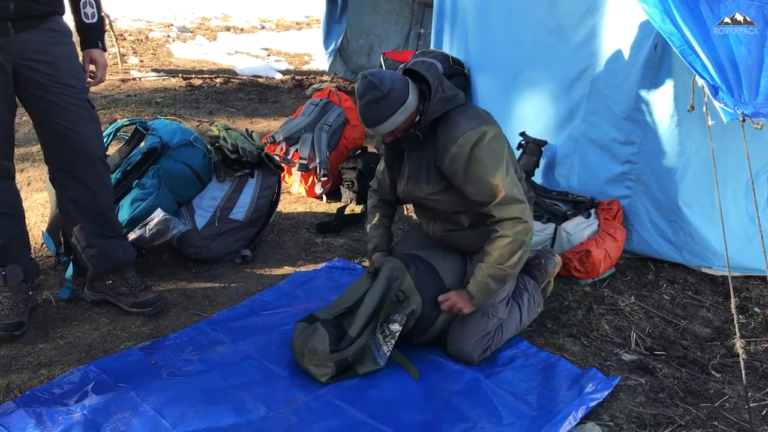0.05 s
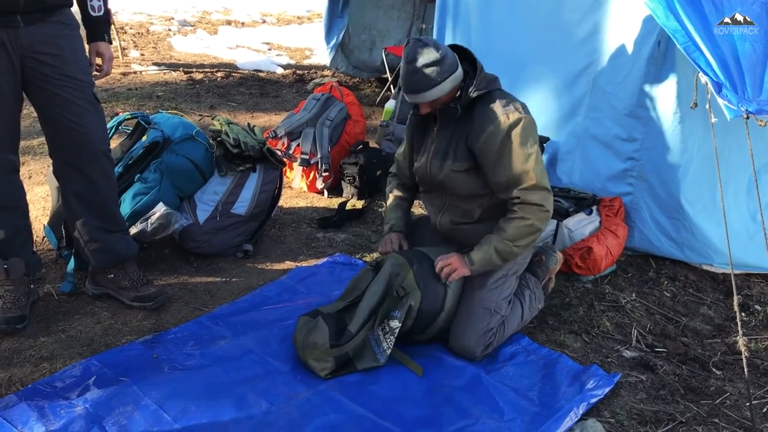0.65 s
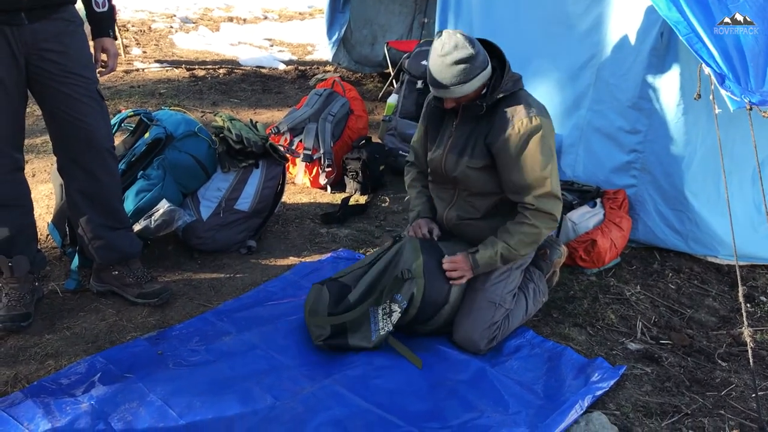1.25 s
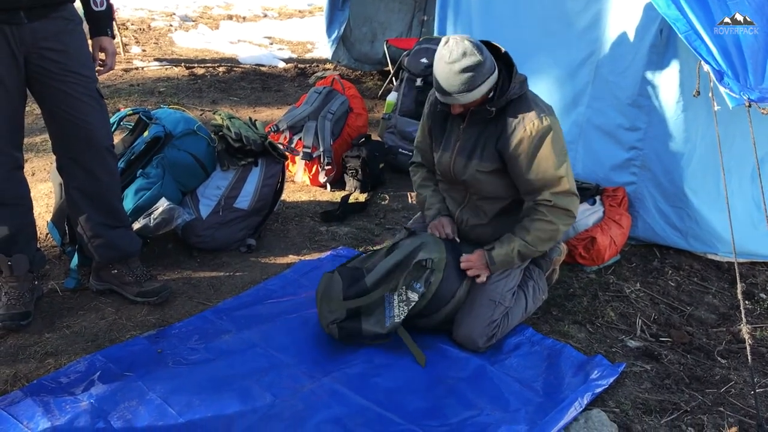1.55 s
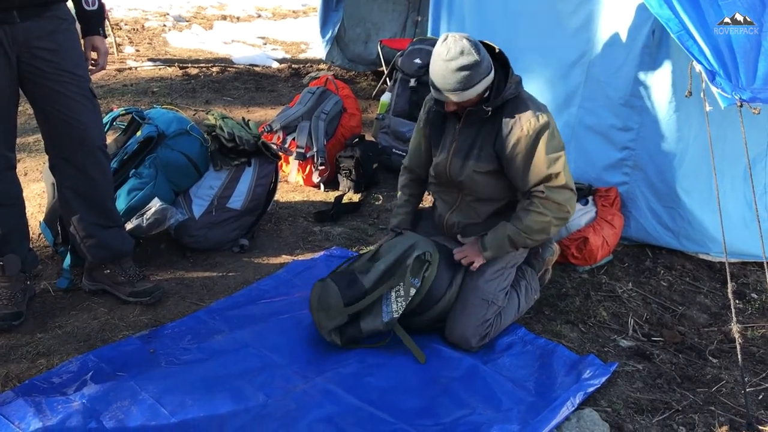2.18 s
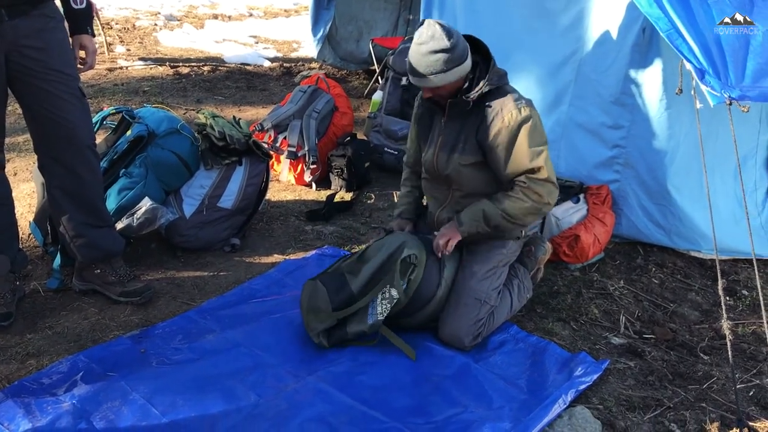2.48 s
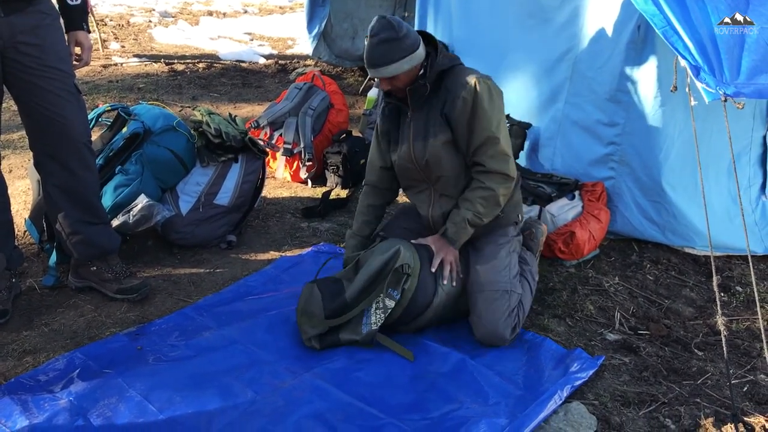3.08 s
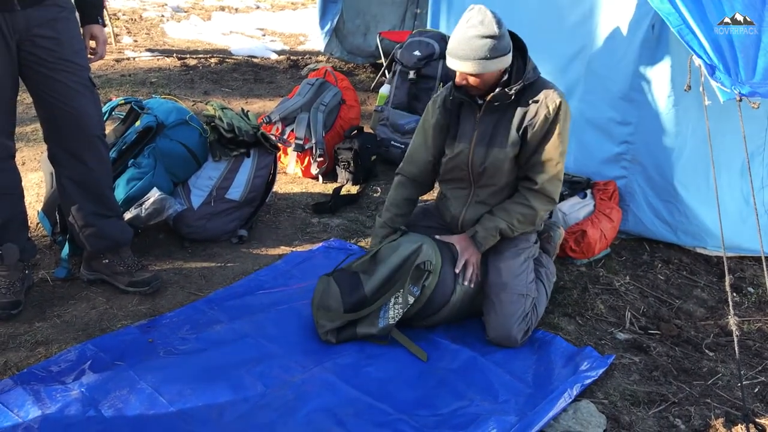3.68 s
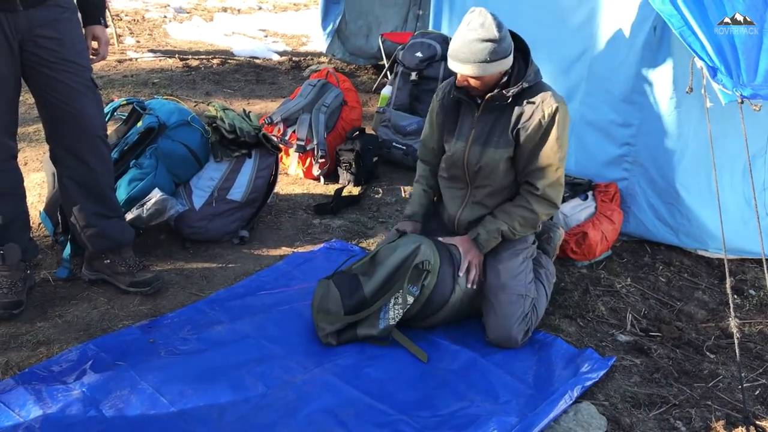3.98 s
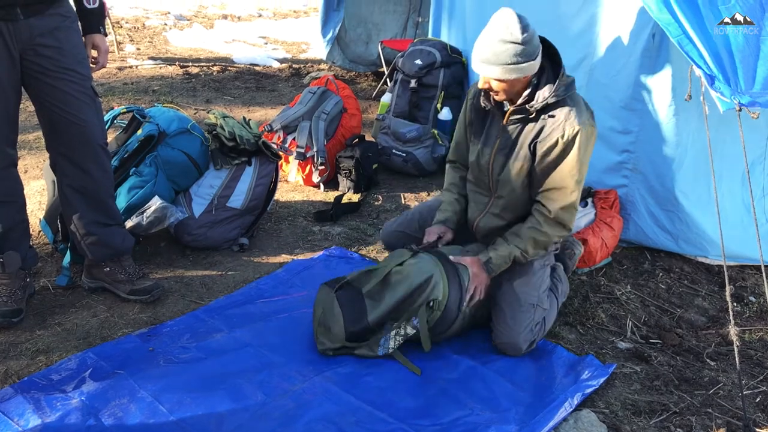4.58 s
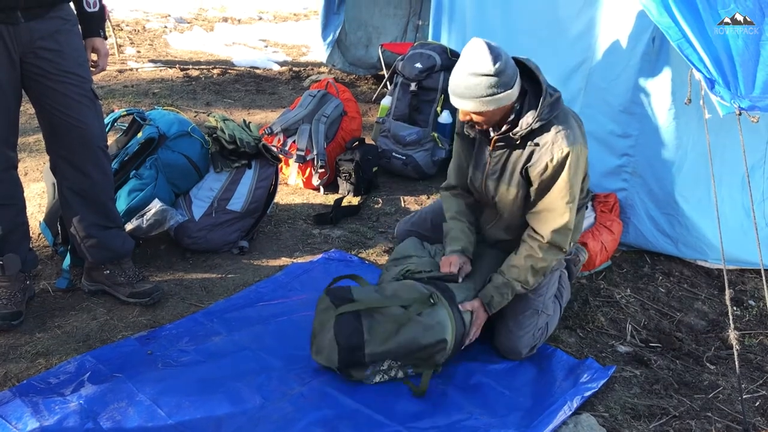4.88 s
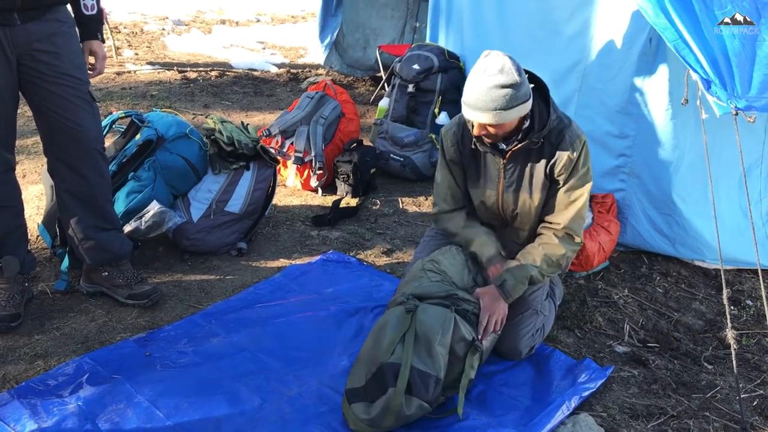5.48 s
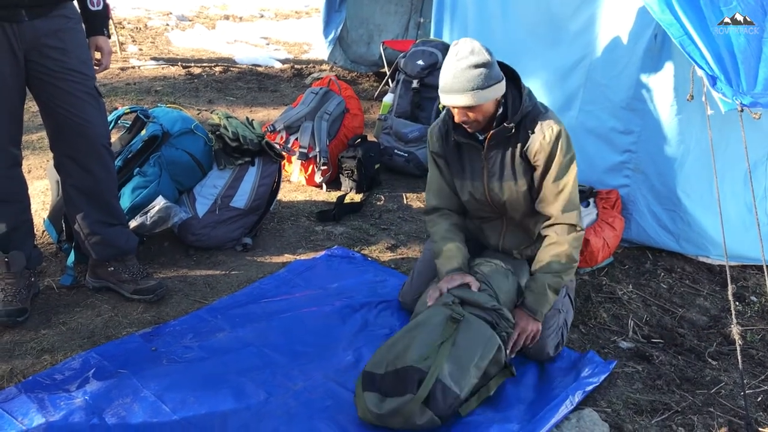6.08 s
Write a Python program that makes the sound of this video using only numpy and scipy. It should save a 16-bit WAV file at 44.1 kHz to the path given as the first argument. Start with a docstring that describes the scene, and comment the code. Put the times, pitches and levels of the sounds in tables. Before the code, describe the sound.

Nylon rustles and crinkles as a stuffed sack is slapped hard, patted, pressed and turned on a plastic tarp outdoors.

```python
"""Outdoors, over faint open air and a low wavering hum (perhaps a far engine), a kneeling man
stuffs a rolled bag into a nylon sack on a plastic tarp. He slaps it hard once, then again more
lightly about a second and a half later: the tight cloth smacks and the padding thuds. As he presses
and turns it, the nylon swishes and the folds crumple. Near 3 s several folds snap over.
From about 4.5 s he pushes harder, with soft thuds and more snaps."""
import sys
import numpy as np
from scipy import signal
from scipy.io import wavfile

SR = 44100
rng = np.random.default_rng(int(sys.argv[2]) if len(sys.argv) > 2 else 0)


def digitize_waveform(pressure):
    """Quantize a signal to 16-bit integers and store it at the path in sys.argv[1].

    Rows of a 2-D input are taken as channels; values are limited to [-1, 1].
    """
    field = np.atleast_2d(pressure).T
    bounded = np.clip(field, -1, 1)
    quanta = np.round(bounded * 32767).astype(np.int16)
    wavfile.write(sys.argv[1], SR, quanta)


N = 279774
TIME = np.arange(N) / SR


def from_db(db):
    """Turn decibels into a number to multiply by."""
    return 10 ** (np.asarray(db) / 20)


def rms_one(x):
    """Scale a sound so that its average strength (rms) is 1."""
    return x / np.sqrt(np.mean(x ** 2) + 1e-20)


def butter(x, hz, kind, order=2):
    """Filter a sound, keeping its "low" part, its "high" part or a "band"."""
    sections = signal.butter(order, np.clip(hz, 10, .45 * SR), kind, fs=SR, output="sos")
    return signal.sosfilt(sections, x + 1e-18)


def drift(rate):
    """A random wobble of about size 1 that changes about `rate` times a second."""
    step, warm_up = 40, 2000
    pole = np.exp(-2 * np.pi * rate * step / SR)
    noise = rng.standard_normal(N // step + warm_up + 2)
    slow = signal.lfilter([1], [1, -2 * pole, pole * pole], noise)[warm_up:]
    return np.interp(np.arange(N) / step, np.arange(len(slow)), rms_one(slow))


def dying(t, t60):
    """Fade away by 60 dB in t60 seconds, the "fade time"."""
    return np.exp(-np.log(1000) * t / t60)


def add(out, start_s, sound):
    """Mix a sound in at the given time."""
    at = round(start_s * SR)
    out[at:at + len(sound)] += sound[:N - at]


def coloured(noises, tone, flicker_db, flicker_rate):
    """Shape two noises to a tone: they take turns feeding narrow bands that each flicker."""
    edges = 22 * 2 ** (np.arange(40) / 4)   # Hz, a quarter octave apart
    hz, db = np.transpose(tone)
    out = 0
    for k, (low, high) in enumerate(zip(edges, edges[1:])):
        level_db = np.interp(np.log(low * high) / 2, np.log(hz), db)
        band = butter(noises[k % 2], [low, high], "band")
        out = out + band * from_db(level_db + flicker_db * drift(flicker_rate))
    return rms_one(out)


# The tone of the open air: (frequency [Hz], relative level [dB])
AIR_TONE = [(25, -8), (55, 2), (110, -2), (200, -6.5), (400, -13.5), (1200, -15.5), (4000, -29.5),
            (15000, -36)]


def open_air():
    """The outdoor air makes a faint, low rumble."""
    noises = rng.standard_normal((2, N))
    return from_db(-53) * coloured(noises, AIR_TONE, flicker_db=1.5, flicker_rate=2.1)


# Moments when the hum swells and bends: (middle [s], half-width [s], pitch [Hz], level [dB])
HUM_SWELLS = [(2.03, .2, 145.8, -49), (5.5, 0.086, 99.6, -55), (5.64, .06, 112, -48)]


def far_hum():
    """One low note, perhaps a far engine, wavers in pitch and loudness."""
    rest_hz, rest_db = 114, -62
    hz, db = rest_hz, rest_db
    for middle, width, swell_hz, swell_db in HUM_SWELLS:
        swell = np.exp(-((TIME - middle) / width) ** 2)
        hz = hz + swell * (swell_hz - rest_hz)
        db = db + swell * (swell_db - rest_db)
    loudness = from_db(db + 2 * drift(5.5))
    wavering_hz = hz * (1 + 0.0282 * drift(6.9))
    return loudness * np.sin(2 * np.pi * np.cumsum(wavering_hz) / SR)


# Weight shifting on the ground: (time [s], level [dB], pitch [Hz])
BUMPS = [(1.09, -39.5, 62), (1.88, -44, 52), (2.62, -41, 58.3), (3.93, -37, 47), (4.09, -48, 55),
         (5.33, -42, 66), (5.49, -46, 55), (5.873, -38, 83)]


def ground_bumps():
    """Knees and bundle settle on the ground with a soft, deep bump."""
    out, t = np.zeros(N), TIME[:SR // 3]
    rise = t / 0.015   # loudest after 15 ms
    for start, db, hz in BUMPS:
        add(out, start, from_db(db) * rise * np.exp(1 - rise) * np.sin(2 * np.pi * hz * t))
    return out


# A hand dragging on tight cloth: (middle [s], length [s], level [dB], pitch [Hz])
SCUFFS = [(0.319, 0.17, -50, 1540), (0.395, .1, -48.5, 1240), (0.693, 0.076, -47.5, 1110),
          (1.415, 0.12, -48, 2090), (1.758, 0.037, -39, 1710), (2.266, 0.075, -42.5, 3600),
          (2.586, 0.091, -45, 1200), (5.075, 0.044, -41, 1550), (5.116, 0.035, -42, 2150),
          (6.15, 0.084, -49, 1140)]


def hand_scuffs():
    """Rubbing noise swells and fades, and the stretched patch gives it a rough pitch."""
    out = np.zeros(N)
    for middle, length, db, hz in SCUFFS:
        swell = signal.windows.hann(round(length * SR))
        scrape = rms_one(butter(rng.standard_normal(len(swell)), [hz / 1.18, hz * 1.16], "band"))
        add(out, middle - length / 2, from_db(db) * swell * scrape)
    return out


# Folds that snap over: (time [s], peak level [dB], ringing pitch [Hz])
SNAPS = [(0.2361, -24, 1390), (3.084, -28, 1300), (3.179, -23, 1220), (3.19, -24.5, 1310),
         (3.21, -22.5, 2050), (3.336, -33.5, 1170), (3.391, -28, 2700), (3.462, -33.5, 1250),
         (4.844, -26, 1370), (4.892, -18.5, 4240), (4.925, -23.5, 1600), (4.968, -29, 1640),
         (5.248, -26.5, 2230), (5.321, -26, 1470), (5.999, -23, 1380), (6.01, -21, 5000),
         (6.105, -27.5, 1510), (6.169, -26, 1120), (6.214, -28, 1670), (6.227, -26.5, 2530)]


def fold_snaps():
    """A fold buckles with a crack, the cloth beside it rings briefly, and a short fizz follows."""
    out, t = np.zeros(N), TIME[:SR // 16]
    for start, peak_db, hz in SNAPS:
        buckle = rng.standard_normal(len(t)) * (dying(t, t60=0.0067) + 0.25 * dying(t, t60=0.063))
        crack = butter(buckle, [900, 3600], "band", order=1)
        ring = butter(buckle, [hz / 1.17, hz], "band", order=1)
        snap = butter(crack + 2.1 * ring, 2.8 * hz, "low", order=1)
        add(out, start, from_db(peak_db) * snap / np.abs(snap).max())
    return out


def slips(per_s, spread_db):
    """Cloth slips in tiny clicks at random moments, most small and a few large."""
    sizes = from_db(spread_db * np.minimum(rng.exponential(1, N), 4))
    signs = rng.choice([-1, 1], N)
    happens = rng.random(N) < per_s / SR
    return rms_one(sizes * signs * happens)


def rubbing(tone, slips_per_s, spread_db, hiss, jerk_db, jerk_rate, flicker_db):
    """Rubbing cloth mixes tiny slips with the hiss of its weave; jerks make both swell and dip."""
    jerks = from_db(jerk_db * drift(jerk_rate))
    noises = [jerks * (slips(slips_per_s, spread_db) + hiss * rng.standard_normal(N)) for _ in range(2)]
    return coloured(noises, tone, flicker_db, flicker_rate=13)


# The tone of crumpling folds: (frequency [Hz], relative level [dB])
CRUMPLE_TONE = [(50, -4.5), (110, -2), (220, 0.5), (400, -4.5), (650, -2.5), (1300, -1), (2200, -3),
                (3100, -5), (3900, -3), (5000, -12), (8000, -14), (15000, -39)]


def crumpling_folds(level_db, slack_db):
    """Folds crumple coarsely; the slacker the cloth, the more lows and the fewer highs."""
    folds = rubbing(CRUMPLE_TONE, slips_per_s=1000, spread_db=4, hiss=0.99,
                    jerk_db=1.5, jerk_rate=37, flicker_db=1.5)
    lows = butter(folds, 1380, "low", order=1)
    highs = folds - lows
    return from_db(level_db) * (lows * from_db(0.75 * slack_db) + highs * from_db(-0.75 * slack_db))


# The tone of sliding nylon: (frequency [Hz], relative level [dB])
SWISH_TONE = [(300, -8.5), (1500, -5), (3800, 1), (5000, -2), (6300, 1), (7400, -4), (8700, 1.1),
              (10500, -5.5), (12200, -1), (15500, -4.5)]


def sliding_nylon(level_db):
    """Nylon slides in so many small slips that they blur into a fine, bright hiss."""
    return from_db(level_db) * rubbing(SWISH_TONE, slips_per_s=9000, spread_db=1, hiss=1.3,
                                       jerk_db=-0.04, jerk_rate=65, flicker_db=2.5)


# Pushes and pulls on the sack:
# (fastest moment [s], rise [s], fall [s], folds level [dB], nylon level [dB], slack [dB])
STROKES = [(0.05, .1, 0.08, -51, -50.5, 1), (0.15, 0.053, 0.082, -38, -40.5, -2.5),
           (0.385, 0.16, 0.061, -47, -44.5, 2), (0.65, 0.046, 0.081, -51, -49.5, -2),
           (0.87, .11, .05, -51, -51.5, -2.5), (0.92, 0.026, 0.11, -40.5, -40, -0.5),
           (1.155, 0.076, 0.059, -46.5, -53, 0.5), (1.24, 0.11, 0.11, -51.5, -49.5, -3),
           (1.415, 0.066, 0.13, -46.5, -44, -8.5), (1.74, 0.12, 0.11, -43, -40.5, -5),
           (1.97, 0.085, 0.16, -49.5, -50, -6), (2.09, 0.12, .15, -44.5, -45.5, 3),
           (2.236, 0.027, 0.069, -45, -45.5, -7), (2.275, 0.059, 0.045, -44.5, -43, -6.5),
           (2.36, 0.077, .045, -43.5, -44, 2.5), (2.55, 0.11, 0.11, -44.5, -43, -3),
           (2.9, 0.15, 0.18, -46.5, -42.5, 1.5), (3.07, 0.16, 0.15, -47, -49.5, 6),
           (3.19, 0.034, 0.07, -45.5, -51, 10.5), (3.42, .2, 0.18, -57, -55.5, 7),
           (3.86, 0.19, 0.094, -53.5, -51.5, 3), (4.03, 0.045, .05, -57, -53.5, -5),
           (4.25, 0.15, 0.13, -52, -53.5, -2), (4.6, 0.18, 0.15, -41, -43.5, 1),
           (4.88, 0.14, 0.18, -40, -39, 3.5), (5.15, 0.23, 0.18, -38, -41, 0.5),
           (5.57, 0.093, .07, -46.5, -48.5, 2), (5.632, 0.074, 0.021, -53, -41.5, 8),
           (5.736, 0.039, 0.014, -45.5, -40.5, 9.5), (5.82, .08, .08, -51.5, -58, 4),
           (5.895, 0.039, 0.12, -44.5, -40.5, -1.5), (6.01, 0.07, 0.16, -41.5, -47, 0),
           (6.17, 0.21, .09, -46.5, -54, 6.5), (6.34, 0.037, .05, -52.5, -53.5, -1)]


def sack_rustle():
    """Each push swells the crumple and the swish; the strongest push has most say in the slack."""
    # The cloth stirs a little even while it is only held.
    folds_power = np.full(N, from_db(-58.5) ** 2)
    nylon_power = np.full(N, from_db(-61) ** 2)
    slack_sum = folds_power * 3   # 3 dB of slack at rest
    for fastest, rise, fall, folds_db, nylon_db, slack_db in STROKES:
        away = np.clip(np.maximum((fastest - TIME) / rise, (TIME - fastest) / fall), 0, 10)
        swell_db = -9 * away ** 1.6   # a rounded top, 9 dB down one rise or fall away
        power = from_db(folds_db + swell_db) ** 2
        folds_power += power
        slack_sum += power * slack_db
        nylon_power += from_db(nylon_db + swell_db) ** 2
    crumple = crumpling_folds(10 * np.log10(folds_power), slack_sum / folds_power)
    return crumple + sliding_nylon(10 * np.log10(nylon_power))


def struck(notes, t, contact_s):
    """A quick push sets several notes ringing; neighbouring notes swing opposite ways."""
    detune = rng.normal(1, .008, len(notes))
    rings = sum((-1) ** k * from_db(db) * dying(t, t60) * np.sin(2 * np.pi * hz * detune[k] * t)
                for k, (hz, db, t60) in enumerate(notes))
    return rings * (1 - np.exp(-t / contact_s))


# The notes of the soft padding: (pitch [Hz], relative level [dB], fade time [s])
PADDING_NOTES = [(67.4, -8, 0.064), (142, -3, 0.071), (142.8, -5, 0.085), (199.5, 3.5, 0.018),
                 (271.6, -11, 0.077), (345, -17, 0.055), (491, -18.5, 0.045), (625, -7.5, 0.035)]
# The notes of the sack's tight skin: (pitch [Hz], relative level [dB], fade time [s])
SKIN_NOTES = [(596, 0, 0.013), (935, -3.5, 0.018), (1257, 5, 0.0073), (1970, -8.5, 0.0098),
              (2850, -3, 0.0097), (3690, -8, 0.01), (4670, -18, 0.01)]
CREASE_LEAD_S = 0.001408   # the cloth gives just before the padding takes the blow


def sack_hit(thud_db, smack_db, crease_db, t60, brightness):
    """The cloth creases in a burst, then the skin smacks and the padding thuds beneath it."""
    t = TIME[:SR // 3]
    noise = rng.standard_normal(len(t))
    dull = butter(butter(noise, [700, 3200], "band", order=1), 9000, "low")
    bright = butter(noise, 3000, "high", order=1)
    crease = from_db(crease_db) * rms_one(dull + brightness * bright) * dying(t, t60)
    since_hit = np.maximum(t - CREASE_LEAD_S, 0)
    thud = from_db(thud_db) * struck(PADDING_NOTES, since_hit, contact_s=0.0003)
    smack = from_db(smack_db) * struck(SKIN_NOTES, since_hit, contact_s=0.00045)
    return crease + thud + smack


# Blows on the sack: (time [s], thud [dB], smack [dB], crease [dB], crease fade time [s],
# crease brightness [0-1], first bounce [dB], time between bounces [s], loss per bounce [dB])
BLOWS = [(0.1553, -19.5, -35, -27.5, 0.089, 0, -46, 0.0063, 5),
         (0.1688, -6, 0.5, -11, 0.034, .15, -20.5, 0.0093, -1),
         (1.7196, -17.5, -17, -23, 0.096, 0.51, -23.5, 0.008, 7),
         (2.625, -27, -30.5, -34, 0.042, 0.2, -35.5, 0.0093, 7),
         (4.419, -31.5, -47, -41, .04, 0.3, -48, .009, 1), (5.164, -34, -46, -37, 0.055, .2, -47, .009, 3),
         (5.888, -30, -53, -38, 0.1, .4, -44, 0.0088, 8)]


def hand_blows():
    """A hand lands on the sack and the bundle bounces three times, usually weaker each time."""
    out = np.zeros(N)
    for lands, thud_db, smack_db, crease_db, t60, brightness, bounce_db, gap, loss_db in BLOWS:
        start = lands - CREASE_LEAD_S
        add(out, start, sack_hit(thud_db, smack_db, crease_db, t60, brightness))
        for k in range(3):
            db = bounce_db - loss_db * k
            add(out, start + (k + 1) * gap, sack_hit(db, db - 3, db - 3.5, t60, brightness))
    return out


def scene():
    """Everything adds up in one channel, with no echo in the open air."""
    background = open_air() + far_hum() + ground_bumps()
    sack = hand_scuffs() + fold_snaps() + sack_rustle() + hand_blows()
    return (background + sack)[None]


def record(dry):
    """The microphone loses the deepest bass, overloads on the hardest slap and cuts the top treble."""
    clipped = np.clip(butter(dry, 41, "high"), -1, 1)
    treble_cut = signal.ellip(12, .1, 90, 15900, fs=SR, output="sos")   # steep, above 15900 Hz
    return signal.sosfilt(treble_cut, clipped)


dry = scene()
out = record(dry)
digitize_waveform(out)
```